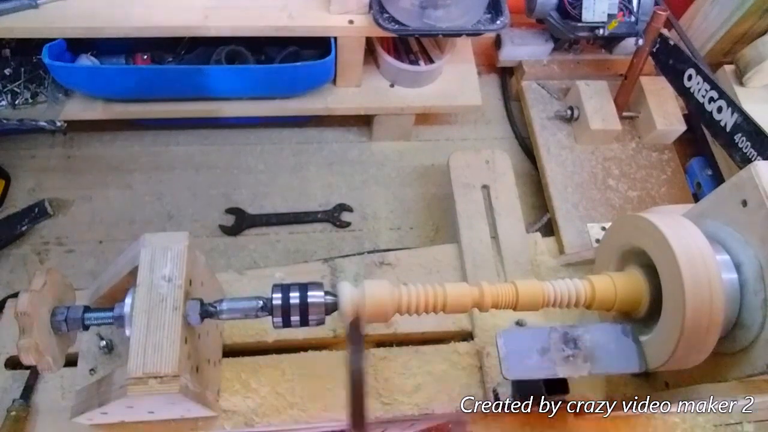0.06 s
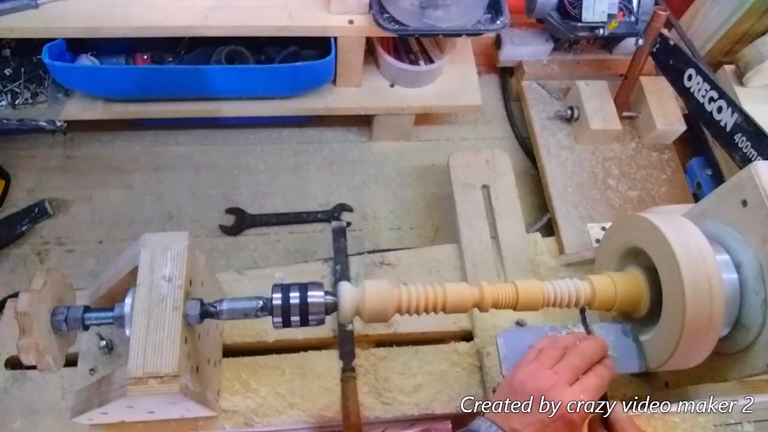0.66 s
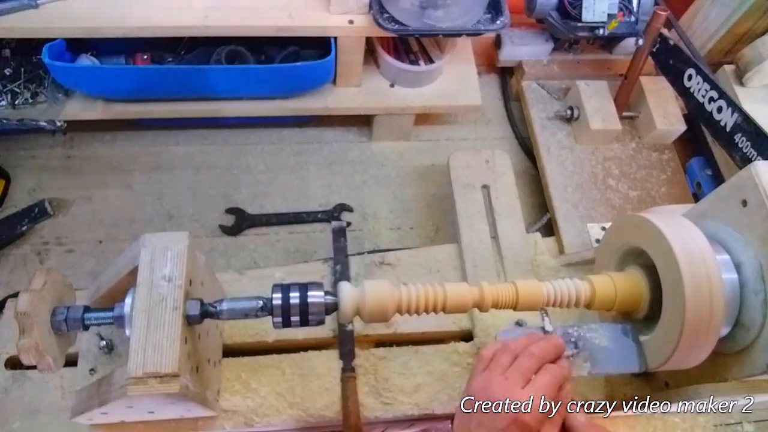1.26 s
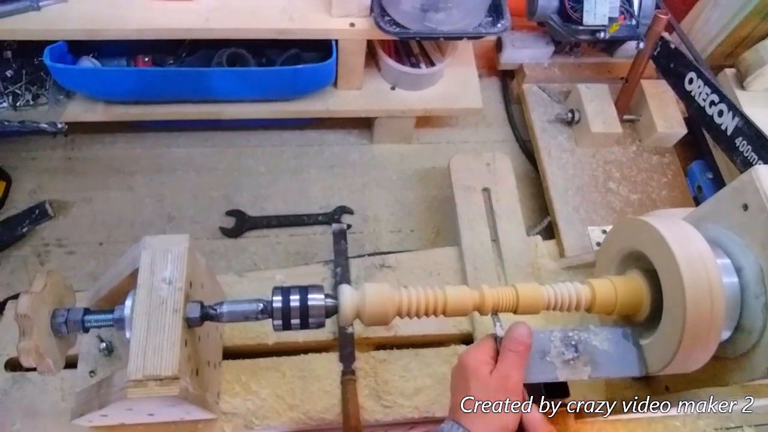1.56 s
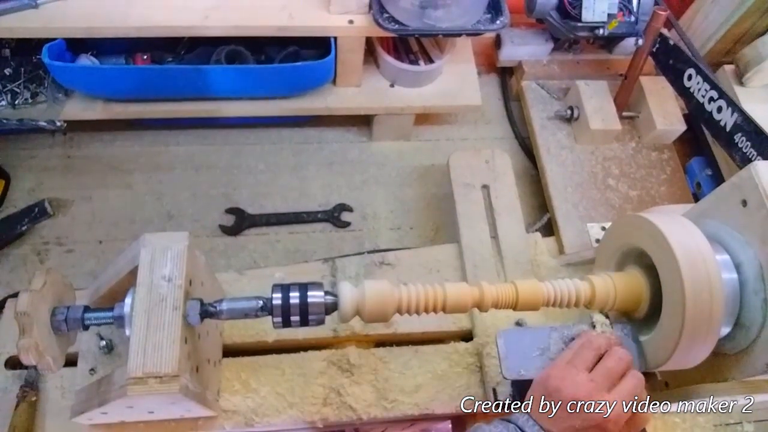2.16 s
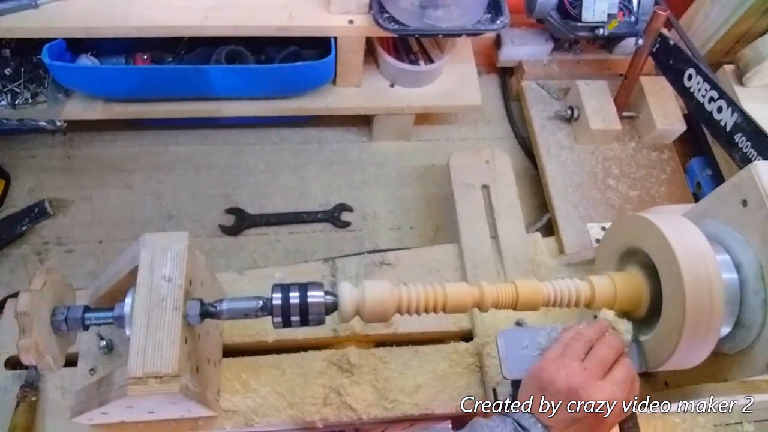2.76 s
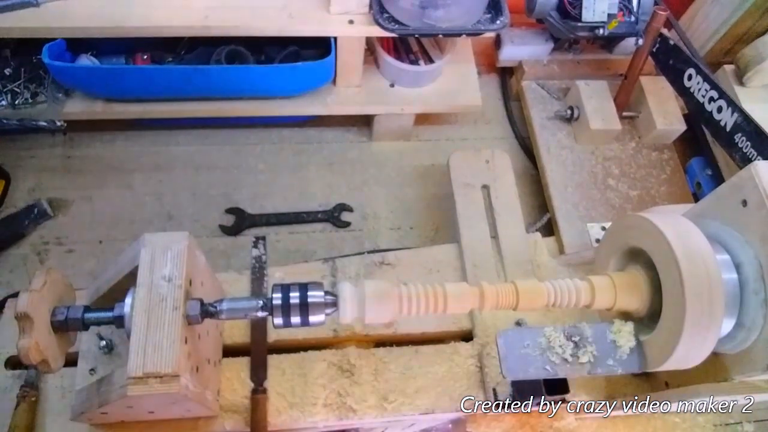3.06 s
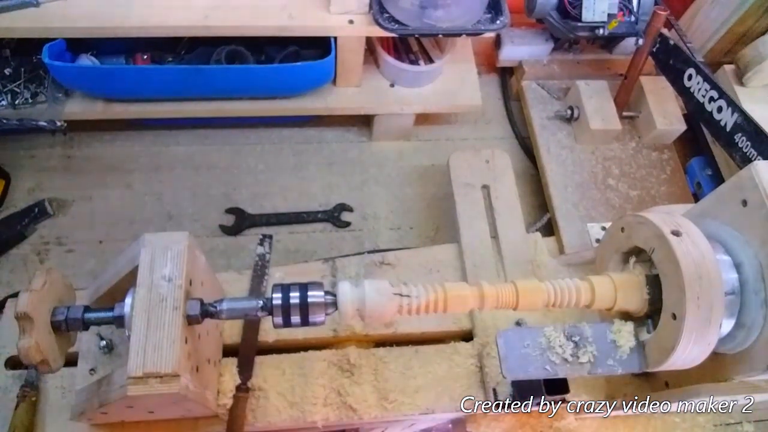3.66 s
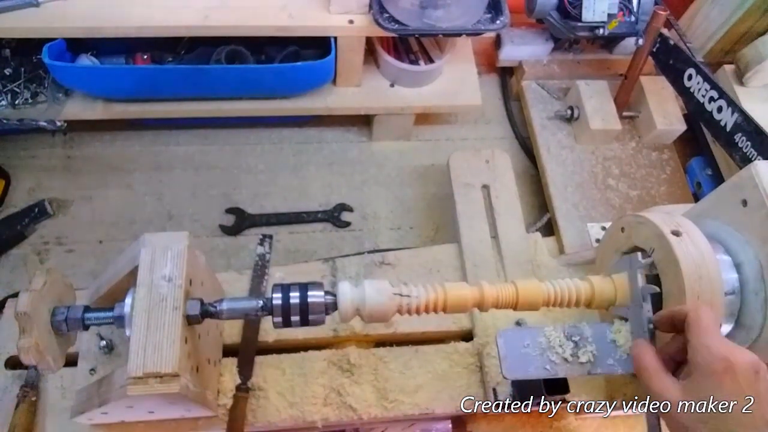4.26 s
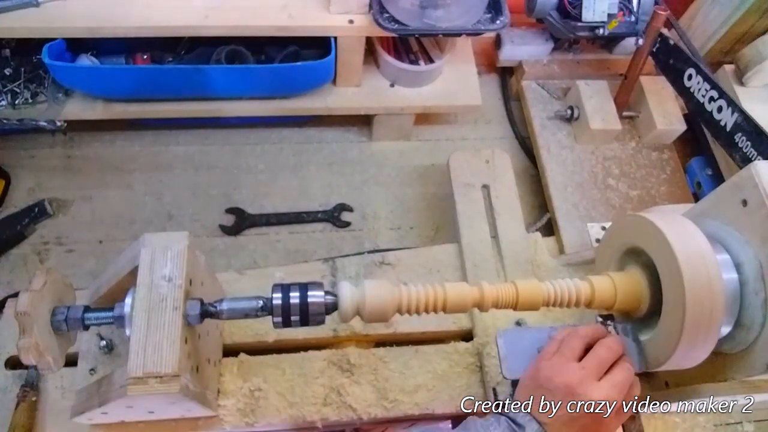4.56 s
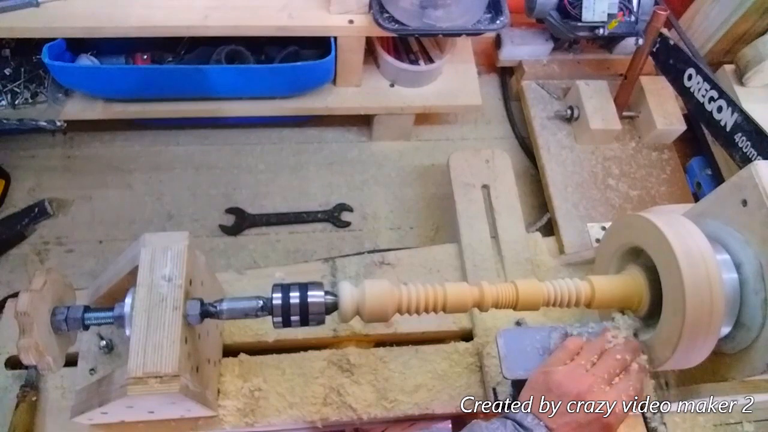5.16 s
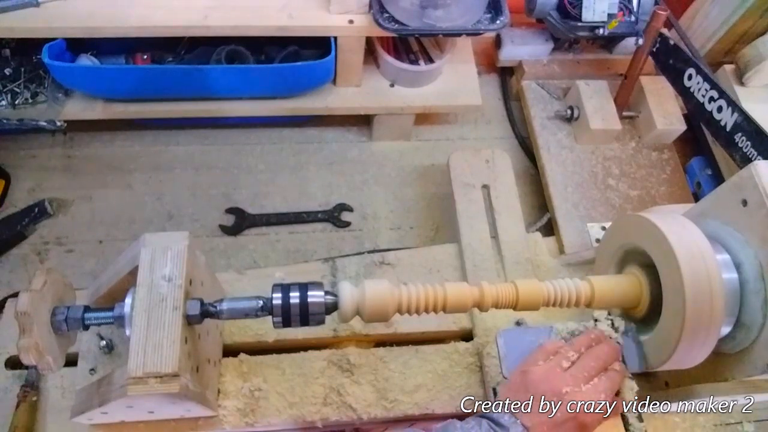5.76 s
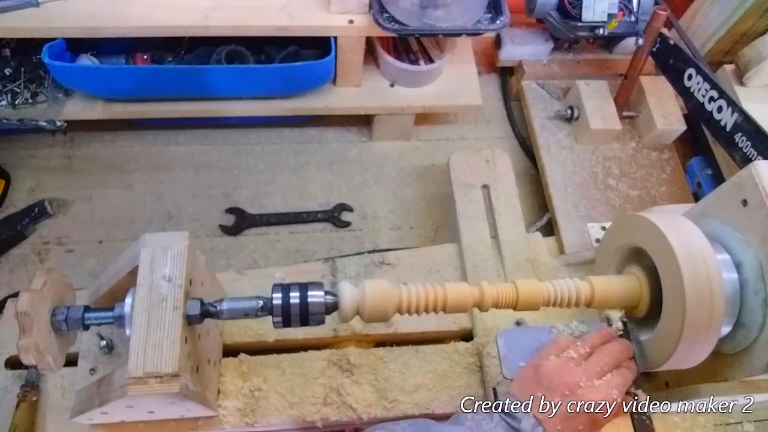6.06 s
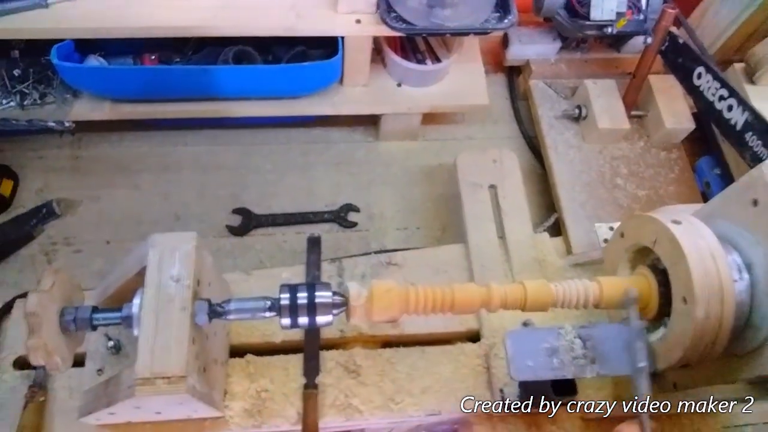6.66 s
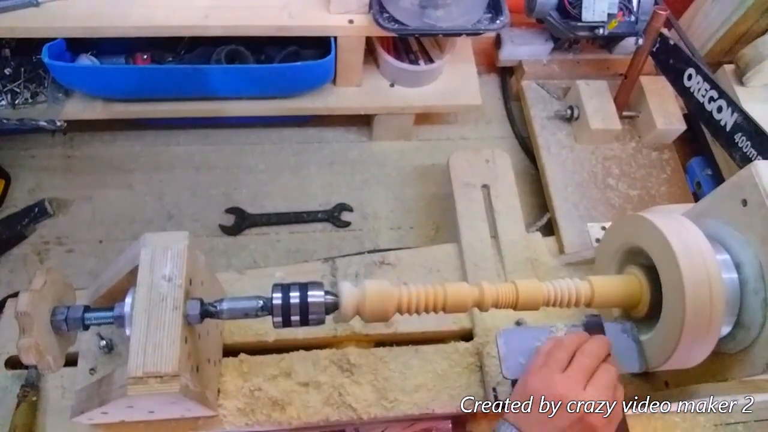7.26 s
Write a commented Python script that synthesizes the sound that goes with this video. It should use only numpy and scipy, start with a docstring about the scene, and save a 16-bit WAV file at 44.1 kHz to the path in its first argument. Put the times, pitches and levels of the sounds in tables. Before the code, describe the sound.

In a quiet workshop, heard from close by, a steel cutter makes rapid, rasping cuts on a wood lathe, over a high, wavering motor whine and a few dull bench bumps. The motor winds down, leaving light taps and brushing, then restarts with a click and a buzz. Heavier cuts follow, then a second wind-down with softer handling, and a final restart with four quick bites. It all sounds sped up.

```python
"""A homemade wood lathe in fast motion, everything high and quick. The motor whines as a steel cutter
bites the spinning wood in short, buzzing cuts that drag the speed down and bump the bench. At 2.8 s it
is switched off and shudders to rest while hands tap and brush about. At 4.4 s it clicks and buzzes back
to life for heavier cuts, then coasts down again from 6.1 s into softer handling. At 7.2 s it restarts
for four last bites."""
import sys
import numpy as np
from scipy import signal
from scipy.fft import rfft, irfft, next_fast_len
from scipy.io import wavfile
from scipy.ndimage import uniform_filter1d, map_coordinates

SR = 44100
rng = np.random.default_rng(int(sys.argv[2]) if len(sys.argv) > 2 else 0)


def generate_wav(signal):
    """Clip the signal to [-1, 1] and save it as 16-bit WAV at the path in sys.argv[1]."""
    frames = np.transpose(np.atleast_2d(signal))
    scaled = np.clip(frames, -1, 1) * 32767
    pcm = np.round(scaled).astype(np.int16)
    wavfile.write(sys.argv[1], SR, pcm)


N = 331191
TIME = np.arange(N) / SR
FREE_HZ, OUTSET_HZ = 1065.9, 853.5  # shaft speed: running free, and as the scene opens
TOP_HZ = 15780  # high cut on the mix

# motor partials, whole multiples from the rotor, the rest from the bearings: (multiple [x shaft], level [dB])
MOTOR_PARTIALS = [(2, 6), (3, 4.5), (3.56, -4), (4, 2), (4.27, -9.5), (5, -3.5), (6, 0), (6.55, -7),
                  (7, -8.5), (7.55, -7), (8, -8.5), (8.53, -3.5), (11, -10.5), (13.1, -6.5), (15.2, -7.5)]
# body EQ of the lathe's frame: (frequency [Hz], gain [dB])
FRAME_EQ = [(100, -48), (500, -38.5), (1050, -21.5), (1250, -23.5), (1550, -4.5), (1800, -22.5), (2100, -7),
            (2700, -11), (3300, -1.5), (4200, -1), (6000, -4), (10000, -0.5), (13000, 0.5), (15500, 6)]
# cutter cues: (start [s], end [s], level [dB], drag on the shaft [Hz/s], steel ring over the wood [dB])
CUT_CUES = [(0, .011, -33.5, 103, 5), (0.009, 0.074, -43, 31.8, 1.5), (0.287, 0.322, -34.5, 567, -15),
            (0.333, .393, -34.5, 520, -10.5), (0.401, .473, -32, 835, -8.5), (0.483, 0.51, -36.5, 803, -4),
            (.573, 0.619, -38, 1303, -5), (0.626, 0.691, -37, 148.7, -17), (0.704, 0.773, -36.5, 318, -17),
            (0.887, 0.956, -35, 478.5, -1), (.968, 1.02, -33.5, 545, 2), (1.036, 1.075, -35, 629, -1),
            (1.084, 1.128, -32, 688, 2.5), (1.192, 1.311, -35, 585, 3.5), (1.459, 1.472, -44.5, 50.2, 6.5),
            (1.576, 1.62, -41.5, 693, 4.5), (1.618, 1.657, -35.5, 876, 14.5),
            (1.894, 1.926, -32.5, 799, -7), (2.011, 2.129, -39, 1410, -8), (2.153, 2.22, -36, 682, -4),
            (2.233, 2.274, -35.5, 418, -2), (2.333, 2.414, -41, 748, -4), (2.43, 2.501, -36.5, 815, -6),
            (2.535, 2.597, -33.5, 1444, -9.5), (2.616, 2.685, -35, 1058, -7.5),
            (2.692, 2.775, -36, 961, -4.5), (2.775, 2.81, -43.5, 30.1, -4),
            (2.846, 2.861, -37.5, 3967, -11.5), (4.573, 4.591, -36.5, 569.5, -3),
            (4.663, 4.707, -34, 2350, -9), (4.735, 4.784, -38, 2470, -6), (4.801, 4.857, -39.5, 2520, -4),
            (4.876, 4.92, -39.5, 2503, -2), (4.941, 4.99, -39, 2323, -3.5), (5.011, 5.072, -39, 2265, -2),
            (5.1, 5.168, -36.5, 2462, -4.5), (5.189, 5.235, -40, 2176, 1),
            (5.255, 5.316, -38.5, 2672, -2.5), (5.407, 5.437, -34, 2380, -9.5), (5.46, 5.529, -36, 499, -2),
            (5.526, 5.571, -35.5, 2060, 2), (5.584, 5.643, -38, 912, -2), (5.647, 5.75, -38.5, 582, 0.5),
            (5.754, 5.838, -36.5, 814, -3), (5.868, 5.984, -37.5, 1100, -2.5),
            (5.994, 6.079, -38.5, 634.4, -1.5), (6.092, 6.124, -38.5, 29.8, -14),
            (6.131, 6.147, -42.5, 601, -0.5), (7.348, 7.38, -34, 636, -10),
            (7.397, 7.417, -32.5, 1074, -8.5), (7.429, 7.472, -34, 1587, -14),
            (7.495, 7.512, -37, 2476, -9)]
# body EQ of the workpiece under the cutter: (frequency [Hz], gain [dB])
WORKPIECE_EQ = [(150, -36.5), (900, -38), (1500, -14), (2700, -11.5), (3300, -3), (3850, 6), (4400, -1.5),
                (4950, 2.5), (6900, -7), (7850, 5.5), (9000, 5), (9800, -8.5), (10750, 0.5), (12200, -12.5),
                (15500, -7)]
# room tone of the quiet workshop: (frequency [Hz], gain [dB])
ROOM_EQ = [(18, -19.5), (30, -4), (286, -14.5), (424, -20.5), (883, -10), (1750, 3.5), (2660, -0.5),
           (4150, -5), (5990, -6), (15800, -39)]
# dull bumps on the bench: (time [s], level [dB])
BUMP_CUES = [(0.234, -60), (1.119, -52), (1.195, -52), (1.621, -53), (2.199, -55), (4.828, -54),
             (5.15, -50.5)]
# power off: (time [s], coasting friction [Hz/s])
OFF_CUES = [(2.825, 1826), (6.115, 2758)]
# frame resonance that the bearings shake at low speed: (frequency [Hz], gain [dB])
SHUDDER_EQ = [(900, -50), (1500, -12), (2500, 0), (3100, 4.5), (3600, 13), (4100, 24), (4650, 5), (5000, 9),
              (5600, -5), (8500, 9.5), (10000, -23)]
# hands and sleeves brushing past: (start [s], end [s], level [dB])
BRUSH_CUES = [(3.192, 3.528, -64.5), (3.56, 3.645, -73), (3.645, 4.029, -64.5), (4.144, 4.405, -71),
              (6.373, 6.669, -72), (6.767, 6.823, -80), (6.965, 7.051, -67.5)]
# tone of the brushing: (frequency [Hz], gain [dB])
BRUSH_EQ = [(300, -21), (900, -24), (1500, -2.5), (6000, -2), (13000, -2.5), (15800, -1.5)]
# the clearer taps of hands and tools: (time [s], relative level [dB])
TAP_CUES = [(3.2315, -48.5), (3.335, -47), (3.3532, -44), (3.3838, -47), (3.4367, -47), (3.473, -39),
            (3.4869, -39), (3.5002, -21), (3.6678, -47.5), (3.7539, -47), (3.8023, -40), (3.909, -45.5),
            (3.9645, -45), (4.0101, -50.5), (4.1822, -26.5), (4.348, -46.5), (4.3718, -48.5),
            (6.6127, -57.5), (6.997, -50.5), (7.0328, -46.5), (7.0534, -53)]
# tone of a tap's knock: (frequency [Hz], gain [dB])
TAP_EQ = [(120, -94), (200, -20), (760, -36), (1100, -13), (1360, -7), (2450, -13), (3400, 5.5), (4990, -4),
          (7200, 3), (15800, -37)]
# power on: (time [s], mains buzz length [s], buzz level [dB])
ON_CUES = [(4.427, 0.072, -41.5), (7.157, 0.11, -42.5)]


def amp(db):
    """Decibels to gain."""
    return 10 ** (np.asarray(db) / 20)


def unit(x):
    """Scale to rms 1."""
    return x / np.sqrt(np.mean(x ** 2) + 1e-20)


def wobble(rate, size=N):
    """A smooth random modulator, rate knots a second."""
    knots = rng.standard_normal(int(size * rate / SR) + 4)
    return map_coordinates(knots, [np.arange(size) * rate / SR])


def filtered(x, gain):
    """Filter x by a gain that depends on frequency."""
    padded = next_fast_len(len(x) + 4096)
    return irfft(rfft(x, padded) * gain(np.fft.rfftfreq(padded, 1 / SR)), padded)[:len(x)]


def eq(x, points):
    """Shape x by (frequency [Hz], gain [dB]) points on a log axis."""
    points_hz, db = np.transpose(points)
    return filtered(x, lambda hz: amp(np.interp(np.log(hz + 1), np.log(points_hz), db)))


def noise(points, size=N):
    """Equalised noise of rms 1."""
    return unit(eq(rng.standard_normal(size), points))


def band(x, low_hz, high_hz):
    """Band-pass with rounded edges."""
    return filtered(x, lambda hz: (1 - 1 / (1 + (hz / low_hz) ** 24)) / (1 + (hz / high_hz) ** 24))


def add(track, start, sound):
    """Mix a sound into the track at start seconds."""
    part = track[max(round(start * SR), 0):][:len(sound)]
    part += sound[:len(part)]


def shaft_speed(recover_s=.258, stall_pull=1.52, grab_hz=222.7, grab=2.8):
    """Turns a second: cuts drag, the motor pulls harder as it slows; switched off, it coasts to rest."""
    step = .001
    t = np.arange(0, N / SR, step)
    during = lambda start, end: np.clip((t - start) / step, 0, 1) * np.clip((end - t) / step, 0, 1)
    drag = sum(load * during(start, end) for start, end, _, load, _ in CUT_CUES)
    coasting = sum(friction * during(off, on) for (off, friction), (on, *_) in zip(OFF_CUES, ON_CUES))
    speeds = [OUTSET_HZ]
    for load, friction in zip(drag[1:], coasting[1:]):
        hz = speeds[-1]
        pull = (FREE_HZ - hz) / recover_s * (1 + stall_pull * (1 - hz / FREE_HZ))
        brake = friction * (grab if hz < grab_hz else 1)  # the bearings grab near rest
        drive = -brake if friction else pull
        speeds.append(max(hz + step * (drive - load), 0))
    eased = np.abs(uniform_filter1d(np.array(speeds, float), size=25))
    return np.interp(TIME, t, eased) * (1 + .0015 * wobble(40))


def motor(speed, angle, whine_db=-46, air_db=-40.5, waver_db=2, surge_db=3.2, stutter_db=6):
    """Rotor and bearings whine over rushing air, voiced by the frame and louder with speed."""
    pace = speed / speed.max()
    shaft = angle + (.02 + .16 * (1 - pace)) * wobble(150)
    whine = sum(amp(db + waver_db * wobble(35)) * np.sin(multiple * shaft + rng.uniform(0, 2 * np.pi))
                for multiple, db in MOTOR_PARTIALS)
    whine = band(whine, 1200, SR) * amp(stutter_db * (1 - pace) * wobble(120))
    hum = amp(-63) * pace ** 18 * np.sin(shaft)  # the unbalance sings only near full speed
    gusts = amp((.8 + 3 * (1 - pace)) * wobble(110))
    air = rng.standard_normal(N) * gusts * amp(surge_db * wobble(25)) * (1 + .36 * np.cos(angle))
    turning = np.clip(speed / 280, 0, 1) ** 2
    return hum + turning * eq(amp(whine_db) * pace ** .81 * whine + amp(air_db) * pace * air, FRAME_EQ)


def rumble(speed, level_db=-82):
    """A faint, dark bed under the lathe that rides its speed."""
    tone = [(25, -10.5), (150, -18.5), (400, -.5), (750, 0), (1500, 4.5), (4000, -61)]
    return speed / speed.max() * amp(level_db + 1.7 * wobble(22)) * noise(tone)


def bite(angle, rough, fourth_db=3, chips_db=6, rasp_share=.79):
    """The edge strikes once a turn; torn fibres scatter the strikes and breaking chips add a rasp."""
    size = len(angle)
    phase = angle + rough * (.06 * wobble(900, size) + .11 * wobble(130, size))
    # every fourth harmonic stands out, and each wavers on its own
    weight = lambda k: amp(fourth_db * (k % 4 == 0) + 3.5 * wobble(55, size))
    strikes = sum(weight(k) * np.cos(k * phase + rng.uniform(0, 2 * np.pi)) for k in range(1, 22))
    chips = amp(chips_db * wobble(700, size))
    rasp = chips * rng.standard_normal(size) * np.exp(.5 * np.cos(phase))
    return eq(unit(strikes) + rasp_share * rough * unit(rasp), WORKPIECE_EQ)


def cutting(speed, angle, hiss_db=-5, swell_db=.7, attack_s=.002, release_s=.0029):
    """Each cut swells as the edge digs in and stops short as it leaves; slow wood tears more."""
    out = np.zeros(N)
    for start, end, db, load, ring_db in CUT_CUES:
        first = max(round((start - .01) * SR), 0)
        span = slice(first, round((end + .015) * SR))
        t = TIME[span]
        slowdown = 1 - speed[span].mean() / FREE_HZ
        rough = min(.1 + 2.5 * slowdown, .55)  # capped so the heaviest cut keeps its pitch
        buzz = bite(angle[span], rough)
        wood = unit(band(buzz, 60, 7120))
        steel = amp(ring_db) * unit(band(buzz, 6160, 10130))
        hiss = amp(hiss_db + .74 * ring_db + .0042 * load) * unit(band(buzz, 10540, 15840))
        gate = (1 + np.tanh(2 * (t - start) / attack_s)) * (1 + np.tanh(2 * (end - t) / release_s)) / 4
        depth = np.sin(np.pi * np.clip((t - start) / (end - start) - .5, -.5, .5))
        push = unit(amp(swell_db * depth + 2.2 * np.sqrt(abs(rough)) * wobble(130, len(t))))
        add(out, first / SR, amp(db) * gate * push * (wood + steel + hiss))
    return out


def bench_bumps(attack_s=.00092, t60=.073):
    """The cutter's rest passes dull knocks to the bench."""
    out = np.zeros(N)
    t = TIME[:SR // 8]
    for start, db in BUMP_CUES:
        thud = noise([(30, -5), (150, -3), (600, -1.5), (2000, -8.5)], len(t))
        add(out, start, amp(db - 60 * t / t60) * (1 - np.exp(-t / attack_s)) * thud)
    return out


def bearing_shudder(speed, angle, critical_hz=400, span_hz=90, shudder_db=-40, whistle_db=-47):
    """At low speed the bearings shake a frame resonance, and a hoarse whistle glides with the shaft."""
    shudder = unit(amp(3 * wobble(220)) * noise(SHUDDER_EQ))
    resonance = np.exp(-((speed - critical_hz) / span_hz) ** 2)
    multiple = 41  # whistle cycles per turn
    whistle = wobble(1800) * np.sin(multiple * angle + wobble(1300))
    fade = np.clip((TOP_HZ - multiple * speed) / 4000, 0, 1) * np.clip(speed / 230, 0, 1) ** 3
    return amp(shudder_db) * resonance * shudder + amp(whistle_db) * fade * whistle


def brushing(flutter_db=6.2):
    """Hands and sleeves rustle past in short strokes of fluttering noise."""
    rustle = unit(amp(flutter_db * wobble(130)) * noise(BRUSH_EQ))
    strokes = sum(amp(db) * np.interp(TIME, [on - .004, on + .0078, off - .004, off + .026], [0, 1, 1, 0])
                  for on, off, db in BRUSH_CUES)
    return strokes * rustle


def fumbles(per_s=20, lift_db=12, scatter_db=3):
    """Cues for faint, random taps while the hands move: (time [s], relative level [dB])."""
    return [(start + (end - start) * rng.random(), db + lift_db + scatter_db * rng.standard_normal())
            for start, end, db in BRUSH_CUES for _ in range(round((end - start) * per_s))]


def taps(trim_db=-5, contact_s=.0061, tail_db=-19, tail_t60=.087, ring_share=.3):
    """Hands and tools touch down: a dry knock and a bright tick with a short room tail."""
    out = np.zeros(N)
    t = TIME[:SR // 16]
    decay = np.exp(-(t / contact_s) ** 4) + amp(tail_db - 60 * t / tail_t60)
    envelope = (1 - np.exp(-t / .0003)) * decay
    for start, db in TAP_CUES + fumbles():
        knock_db = 2 - .55 * max(db + 59.5, 0)  # harder taps are less knock, more tick
        modes_hz = 3600 * 2 ** rng.uniform(-1.7, 1, (4, 1))  # each thing touched has its own modes
        ring = unit(np.sin(2 * np.pi * modes_hz * t).sum(0))
        knock = unit(band(noise(TAP_EQ, len(t)) + ring_share * ring, 100, 5020))
        tick = unit(band(rng.standard_normal(len(t)), 4420, 16400))
        add(out, start, amp(db + trim_db) * envelope * unit(amp(knock_db) * knock + tick))
    return out


def switch_on(buzz_hz=4820, click_db=-40, click_t60=.061):
    """The switch clicks and the windings buzz briefly as the rotor picks up speed."""
    out = np.zeros(N)
    t = TIME[:SR // 4]
    for start, length, db in ON_CUES:
        hold = 1 / (1 + (t / length) ** 6)
        buzz = np.sin(2 * np.pi * buzz_hz * t + .34 * wobble(250, len(t)))
        rattle = 1.1 * noise(FRAME_EQ, len(t))
        click = noise([(200, -96), (1400, 41), (5000, 33), (15000, 35)], len(t))
        add(out, start, amp(db) * hold * (buzz + rattle) + amp(click_db - 60 * t / click_t60) * click)
    return out


def scene(room_db=-84):
    """One shaft drives motor and cuts; bench, room tone and hands join them in dual mono."""
    speed = shaft_speed()
    angle = 2 * np.pi * np.cumsum(speed) / SR
    lathe = motor(speed, angle) + bearing_shudder(speed, angle) + switch_on() + cutting(speed, angle)
    mono = lathe + rumble(speed) + bench_bumps() + amp(room_db) * noise(ROOM_EQ) + brushing() + taps()
    return np.array([mono, mono])


def record(dry, knee_db=-18, recovery_s=.064):
    """Gentle gain control ducks after loud cuts, then a steep high cut trims the top."""
    keep = np.exp(-1 / (recovery_s * SR))
    power = signal.lfilter([1 - keep], [1, -keep], dry[0] ** 2)
    ducked = dry / np.sqrt(1 + power / amp(knee_db) ** 2)
    high_cut = lambda hz: np.clip((TOP_HZ - hz) / 200 + .5, 0, 1)
    return np.array([filtered(channel, high_cut) for channel in ducked])


dry = scene()
out = record(dry)
generate_wav(out)
```